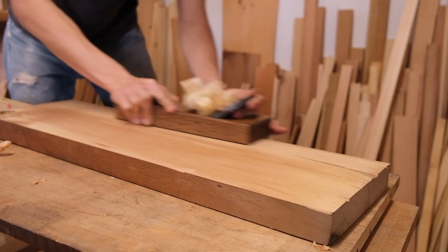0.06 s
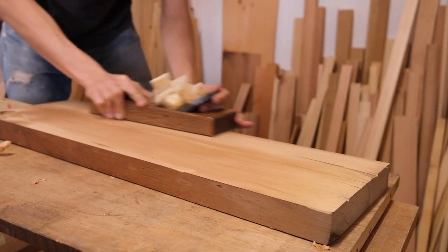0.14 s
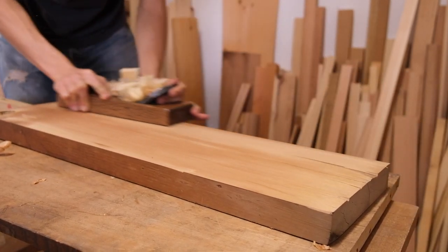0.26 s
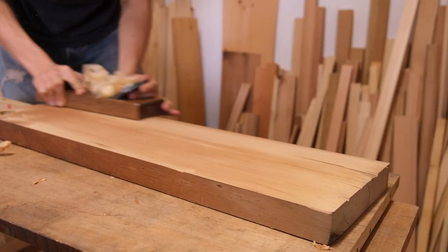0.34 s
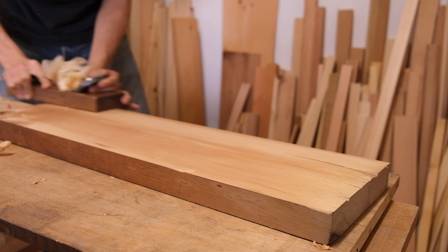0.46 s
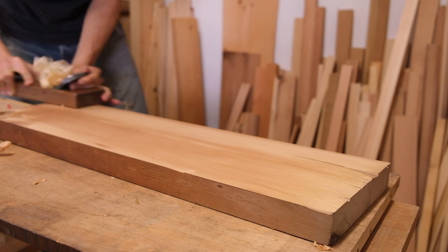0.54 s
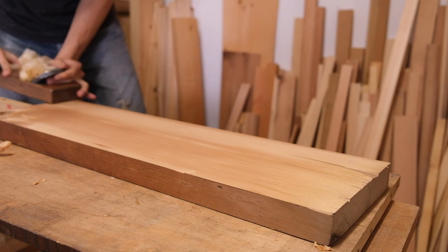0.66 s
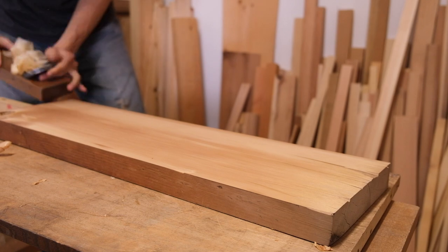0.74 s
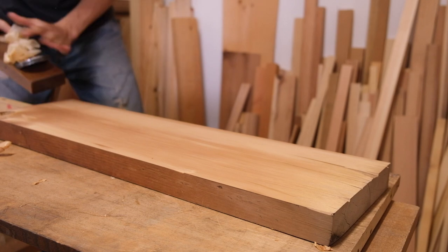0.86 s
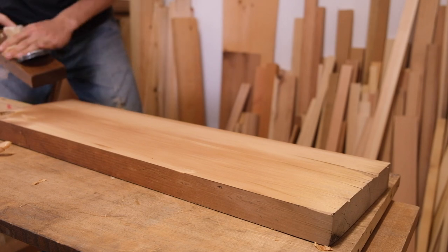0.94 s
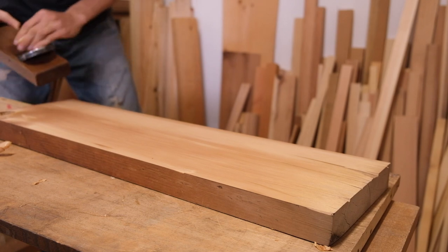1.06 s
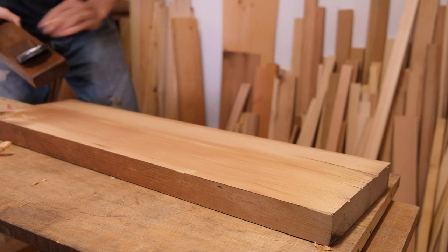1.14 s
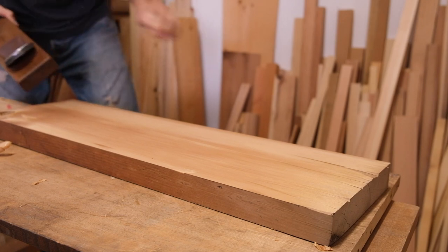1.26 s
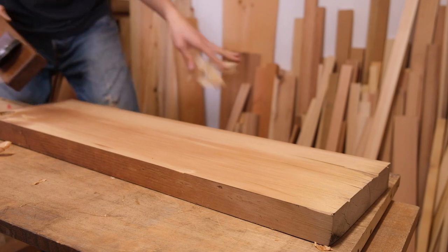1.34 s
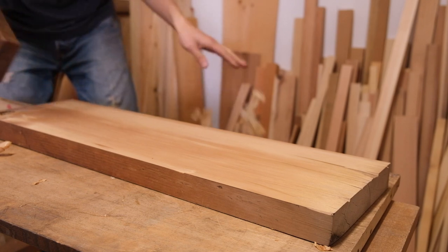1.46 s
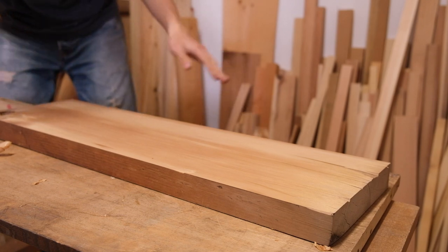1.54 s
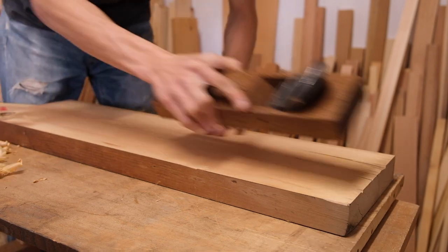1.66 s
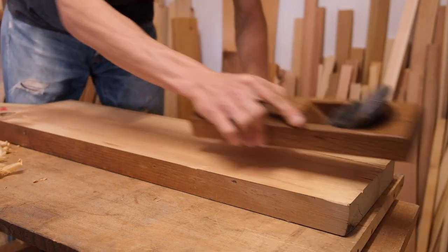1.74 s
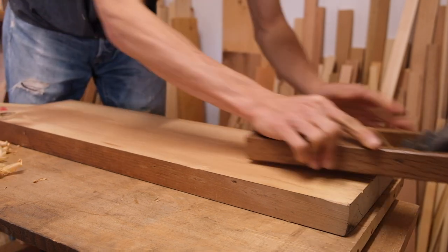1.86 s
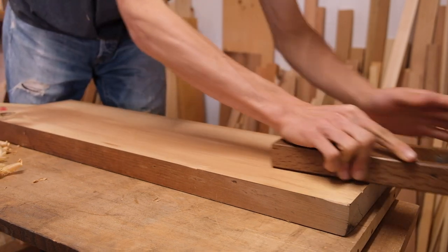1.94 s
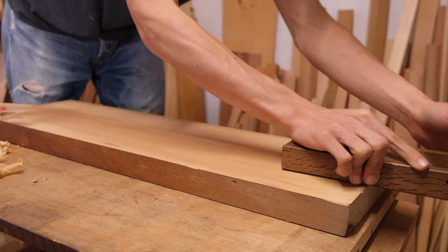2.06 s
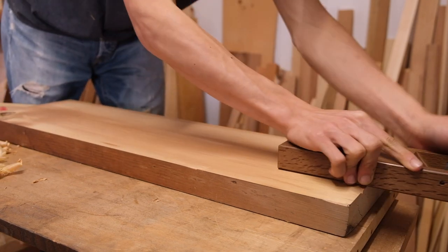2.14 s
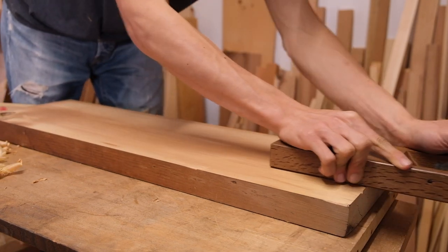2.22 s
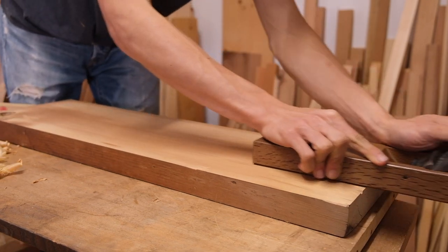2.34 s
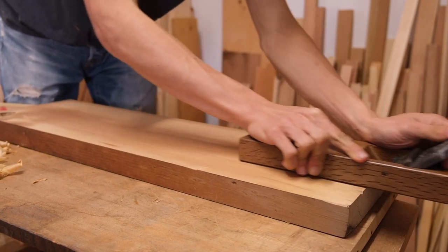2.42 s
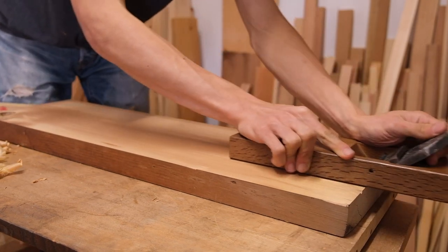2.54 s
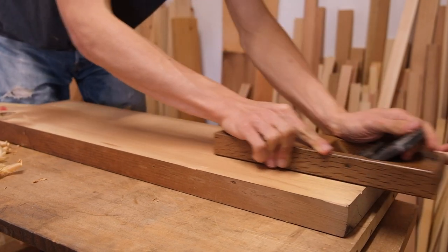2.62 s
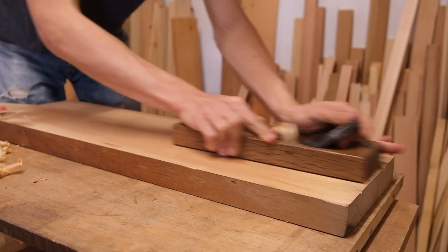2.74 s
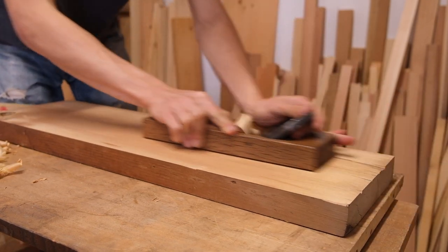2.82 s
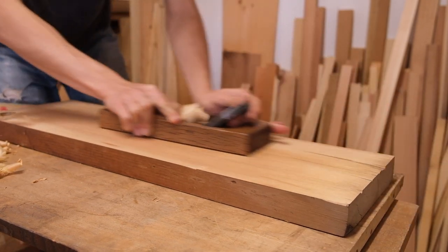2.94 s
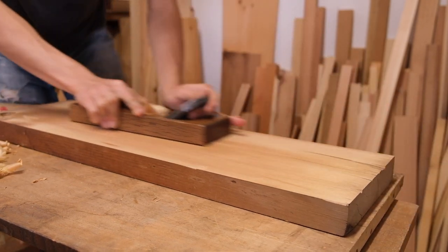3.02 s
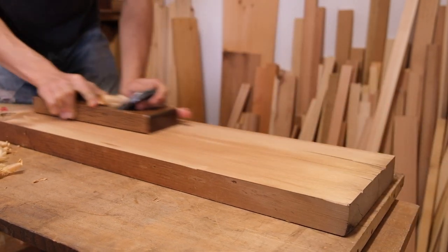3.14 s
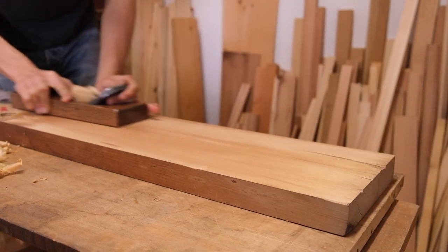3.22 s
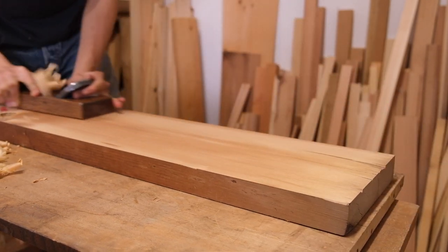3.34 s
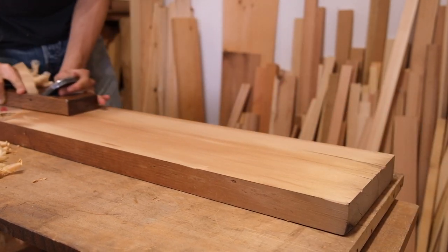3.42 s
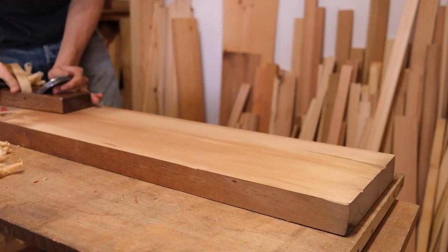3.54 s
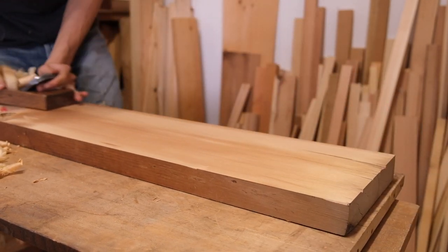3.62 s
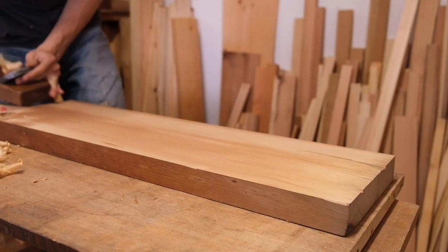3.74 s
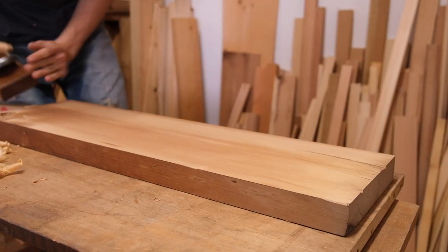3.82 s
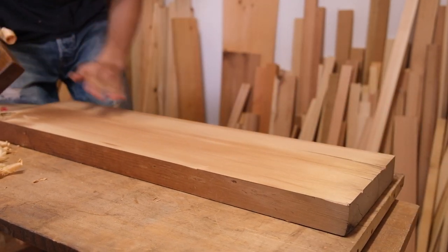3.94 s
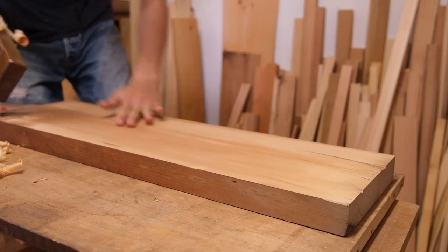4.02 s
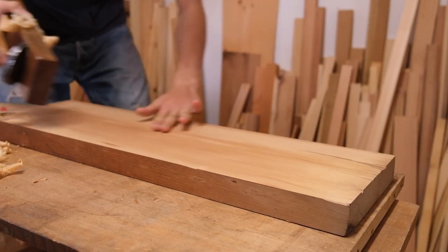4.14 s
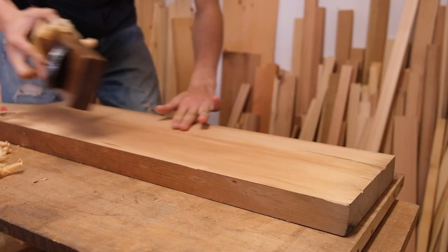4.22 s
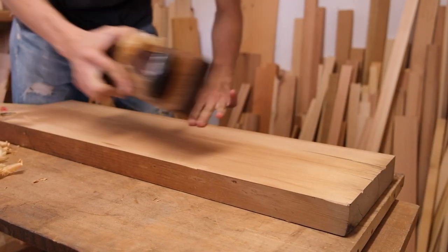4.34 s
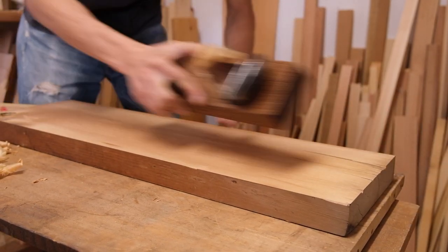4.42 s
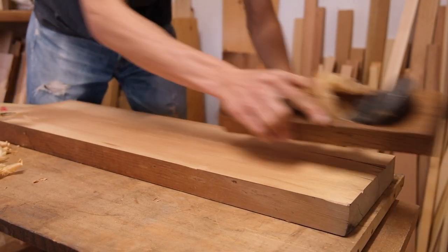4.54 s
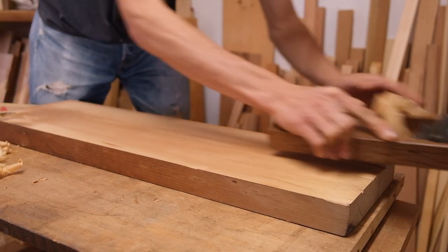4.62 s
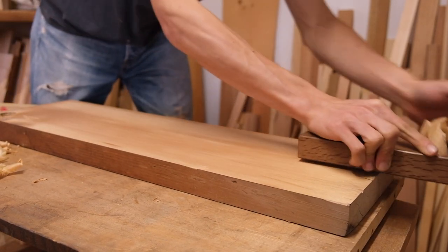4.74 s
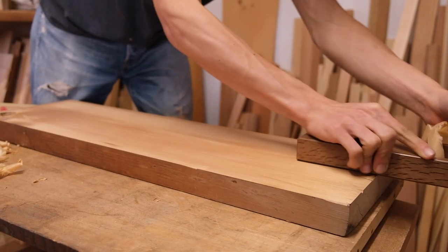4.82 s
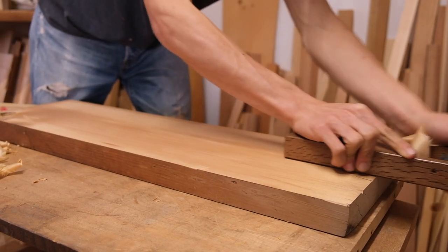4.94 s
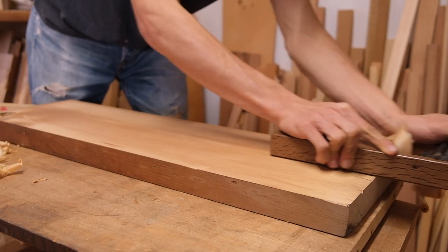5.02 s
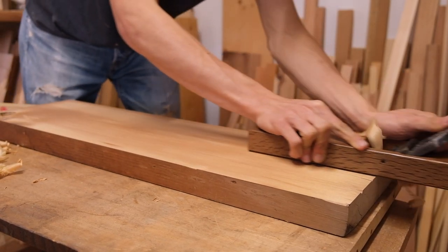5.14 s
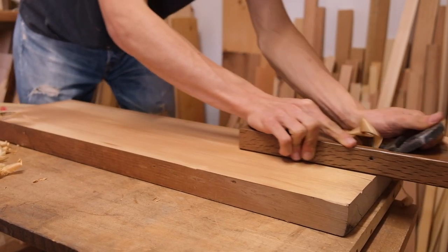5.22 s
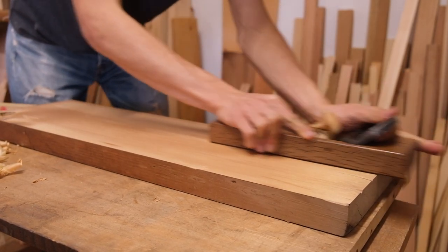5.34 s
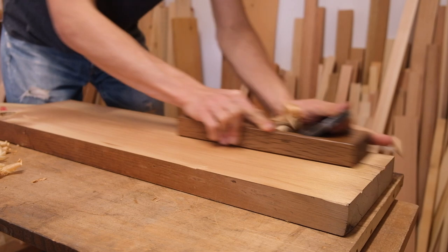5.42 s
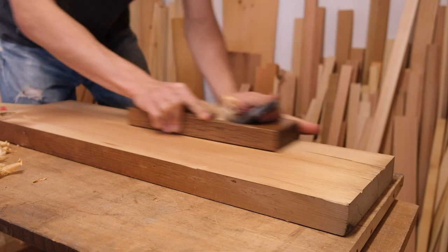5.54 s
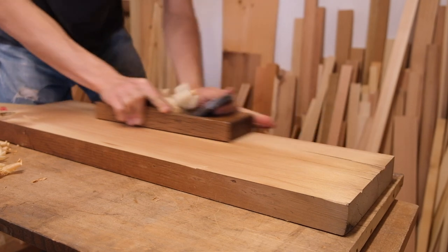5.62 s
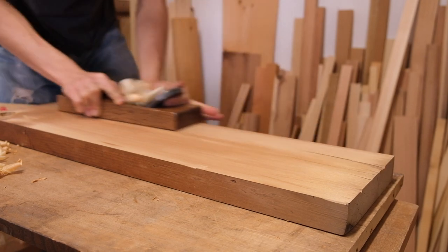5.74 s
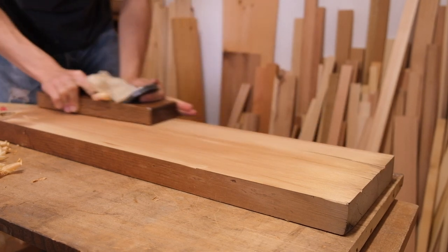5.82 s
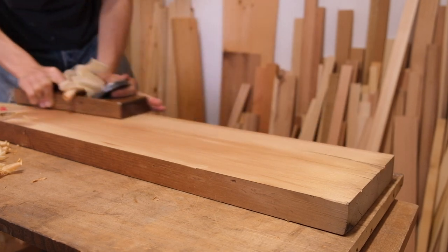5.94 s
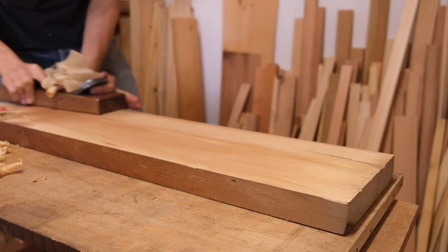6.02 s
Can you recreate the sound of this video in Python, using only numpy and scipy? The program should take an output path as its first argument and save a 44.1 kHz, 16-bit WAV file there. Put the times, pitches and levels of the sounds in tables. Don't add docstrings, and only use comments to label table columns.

```python
import sys
import numpy as np
from scipy import signal
from scipy.io import wavfile

SR = 44100
rng = np.random.default_rng(int(sys.argv[2]) if len(sys.argv) > 2 else 0)


def wav_out(sig):
    wavfile.write(sys.argv[1], SR, np.round(np.clip(np.atleast_2d(sig).T, -1, 1) * 32767).astype(np.int16))


def undo_db(level):
    steps = np.asarray(level, float) / 20
    return 10 ** steps


N = 268128
TIME = np.arange(N) / SR
STEPS = TIME[::64]
SCENE_CHANGE_S = 1.622
IDLE_HZ = 4100

# t/s, cut of the iron/dB, weight on the sole/dB, fibre pitch that follows speed f/Hz
STROKES = [
    [(0.0, -24.5, -31.5, 5940), (.075, -27.5, -36, 5940), (.11, -26.5, -32.5, 4650),
     (.214, -26.5, -31.5, 4650), (.3, -30, -34, 4990), (.4, -31.5, -34, 4100), (.472, -33, -34.5, 4450),
     (.534, -42, -32, 4640), (.57, -42, -51, 4500)],
    [(2.5, -33, -30, 4280), (2.559, -42, -32.5, 4060), (2.64, -24, -29.5, 3700), (2.77, -20.5, -33.5, 4450),
     (2.93, -24.5, -32.5, 5100), (3.01, -28, -32.5, 6170), (3.1, -36, -33, 4460), (3.4, -25, -33.5, 4120),
     (3.54, -42, -29.5, 4100)],
    [(5.05, -44, -46, 3590), (5.236, -40.5, -28, 3600), (5.305, -25.5, -30.5, 3600),
     (5.42, -25.5, -28.5, 5310), (5.53, -29, -32.5, 5390), (5.62, -34.5, -35.5, 4530),
     (5.78, -30.5, -31, 4400), (5.9, -29, -31.5, 4600), (6.08, -33, -32, 4200)],
]


def rms_one(x):
    return x / np.sqrt(np.mean(x ** 2) + 1e-20)


def in_time(tables):
    s, *columns = np.vstack(tables).T
    return [np.interp(TIME, s, column) for column in columns]


def every_sample(rows):
    return np.array([np.interp(TIME, STEPS, row) for row in rows])


def at_hz(points, hz):
    point_hz, point_db = np.array(points).T
    return np.interp(np.log(hz), np.log(point_hz), point_db)


def drift(rate):
    r = np.exp(-80 * np.pi * rate / SR)
    slow = signal.lfilter([1], [1, -2 * r, r * r], rng.standard_normal(N // 40 + 2002))[2000:]
    return np.interp(np.arange(N) / 40, np.arange(len(slow)), rms_one(slow))


def resonance(x, hz, width_hz):
    r = np.exp(-np.pi * width_hz / SR)
    poles = [1, -2 * r * np.cos(2 * np.pi * hz / SR), r * r]
    return signal.lfilter(np.array([1, 0, -1]) * (1 - r * r) / 2, poles, x)


def bands(sources, low_hz):
    edges = low_hz * 2 ** (np.arange(40) / 3)
    edges = edges[edges < 18000]
    for k, (low, high) in enumerate(zip(edges, edges[1:])):
        sos = signal.butter(2, [low, high], "band", fs=SR, output="sos")
        band = rms_one(signal.sosfilt(sos, sources[k % 2]))
        yield np.sqrt(low * high), band * np.sqrt(high - low)


def alive(s, length):
    t = np.arange(min(round(length * SR), N - round(s * SR))) / SR
    return t, ~((s < SCENE_CHANGE_S) & (s + t > SCENE_CHANGE_S))


def gesture(s, swell, fade):
    fall_db, roundness = 25, 1.55
    away = np.maximum((s - STEPS) / swell, (STEPS - s) / fade)
    ended = (s < SCENE_CHANGE_S) & (STEPS > SCENE_CHANGE_S)
    return undo_db(-fall_db * away ** roundness) ** 2 * ~ended


def on_wood():
    edge_s = 0.029
    total = 0
    for rows in STROKES:
        inside = np.minimum(TIME - rows[0][0], rows[-1][0] - TIME)
        total = total + np.clip(inside / edge_s + 1, 0, 1)
    return total


def hush():
    # f/Hz, level/dB per Hz
    hush_spectrum = [(12, -20), (20, 13), (70, -24), (130, 4.5), (168, -50), (198, -7), (241, -17),
                     (270, 3.5), (301, -49), (357, -33), (388, -11.5), (513, -20), (1960, -18),
                     (16000, -40)]
    level_db = -46.5 - 1.0
    parts = [(hz, band * undo_db(at_hz(hush_spectrum, hz)))
             for hz, band in bands(rng.standard_normal((2, N)), low_hz=14.15)]
    scale = undo_db(level_db) / np.std(sum(band for hz, band in parts))
    before = TIME < SCENE_CHANGE_S
    out = np.zeros(N)
    for hz, band in parts:
        early_db = -8.0 * (hz < 450) - 3.8 * (hz > 6000)
        out += band * undo_db(early_db * before)
    return scale * out


def layers(cut_db, bright_db, pitch_hz, rustle_db):
    per_bright, db_per_octave = 0.13, 22.5
    speed_octaves = np.log2(pitch_hz / IDLE_HZ)
    fine_db = cut_db + rustle_db + per_bright * bright_db + db_per_octave * speed_octaves
    return undo_db(np.array([cut_db - bright_db, cut_db, fine_db])) ** 2


def handling():
    # peak t/s, swell/s, fade/s, level/dB, brightness/dB
    shavings = [(.19, 0.023, 0.062, -28, 9), (.961, 0.022, 0.078, -23, 11.5),
                (1.111, 0.23, 0.082, -27.5, 9), (1.309, 0.041, 0.2, -35, 11.5),
                (1.42, 0.22, 0.061, -36.5, 10), (1.541, 0.023, 0.22, -36.5, 10),
                (1.68, 0.34, 0.091, -46.5, 15), (1.892, 0.09, 0.24, -40.5, 6), (3.0, 0.053, 0.046, -24, 23),
                (3.862, 0.07, 0.083, -42.5, 1), (3.98, 0.024, 0.06, -47, -1),
                (4.352, 0.0062, 0.092, -38.5, 2), (4.106, 0.073, 0.37, -44.5, 1),
                (4.29, 0.25, 0.23, -48, 52), (4.66, .3, .2, -59, 30), (5.158, .006, .03, -32, 8),
                (5.352, .04, .05, -29, 12), (2.605, .01, .05, -33, 3), (3.46, .06, .05, -33, 4),
                (.92, .03, .05, -46, 20), (5.45, .1, .12, -33, 60), (3.265, .02, .12, -33, 5),
                (1.97, .02, .08, -42, 6), (2.69, .07, .07, -30, 15), (4.958, .05, 0.35, -34.5, 5),
                (5.178, 0.12, 0.17, -31.5, 30), (5.536, 0.099, 0.029, -39, 14),
                (5.668, 0.091, 0.05, -28.5, 63)]
    # peak t/s, swell/s, fade/s, level/dB, brightness/dB
    rubs = [(.514, 0.063, 0.05, -25, 20.5), (.716, 0.39, 0.084, -46, -12.5), (.86, 0.56, 0.14, -61, -18),
            (2.068, 0.13, 0.1, -38, -9.5), (2.2, .15, 0.51, -46, 1.5), (2.4, 0.18, 0.34, -43.5, -1.5),
            (2.483, 0.013, 0.061, -24.5, 1.5), (3.577, 0.038, 0.079, -30.5, 0),
            (3.7, 0.19, 0.17, -42.5, -3.5), (4.5, 0.17, 0.2, -52.5, -2), (4.83, .012, .12, -57, 7),
            (4.55, .12, .035, -54, 3), (4.78, .09, .05, -58, -3)]
    stroke_rustle_db, shaving_rustle_db, rub_rustle_db = -19, -19.5, -25
    fibre_db = 2.5

    cut_db, sole_db, pitch_hz = in_time(STROKES)
    riding = on_wood()
    power = riding ** 4 * layers(cut_db, cut_db - sole_db, pitch_hz, stroke_rustle_db) + 1e-9
    touches = 0
    for rows, rustle_db in [(shavings, shaving_rustle_db), (rubs, rub_rustle_db)]:
        for s, swell, fade, db, bright_db in rows:
            touch = layers(db, bright_db, IDLE_HZ, rustle_db)[:, None]
            touches = touches + touch * gesture(s, swell, fade)
    power += every_sample(touches)
    return 10 * np.log10(power), pitch_hz, fibre_db * riding


def fibres(per_s, spread_db):
    hardness_db = spread_db * np.minimum(rng.exponential(1, (2, N)), 5.0)
    sizes = undo_db(hardness_db) * rng.choice([-1, 1], (2, N))
    return sizes * (rng.random((2, N)) < per_s / SR) + 1e-18


def rubbing():
    # f/Hz, width/Hz, level/dB
    iron_modes = [(871, 127, -2), (1180, 61, -1), (1287, 110, -9), (1593, 110, -6.5), (1740, 220, -4.5),
                  (1950, 200, 1.5), (3230, 170, -3), (4400, 710, -4.5), (4455, 210, -5), (5940, 690, -0.5),
                  (6700, 190, -20), (8110, 220, -2)]
    # f/Hz, level/dB per Hz
    tearing = [(180, -43), (300, -18), (645, -15.5), (885, -7), (1930, -3), (2700, -6.5), (4520, -2.5),
               (5250, -10), (8090, -9), (15000, -28), (16000, -23)]
    anchors_hz = [1200, 4500, 11000]
    iron_flicker_db, hiss_flicker_db, flicker_per_s = 1.6, 1.7, 9.7

    levels, pitch_hz, emphasis_db = handling()
    snaps = fibres(per_s=4500.0, spread_db=2.4)
    shared = drift(rate=5.1)
    parts = []   # Hz, sound, keenness for the fibre pitch, flicker dB
    for k, (hz, width_hz, db) in enumerate(iron_modes):
        ring = resonance(resonance(snaps[k % 2], hz, width_hz), hz, 2 * width_hz)
        parts.append((hz, undo_db(db) * np.sqrt(width_hz) * rms_one(ring), 1.6, iron_flicker_db))
    for hz, band in bands(snaps, low_hz=265.0):
        parts.append((hz, undo_db(-1.5) * band, 0.35, hiss_flicker_db))

    out = np.zeros(N)
    for hz, sound, keenness, flicker_db in parts:
        place = np.interp(np.log(hz), np.log(anchors_hz), [0, 1, 2])
        shares = np.clip(1 - np.abs(place - np.arange(3)), 0, 1)
        shape_db = at_hz(tearing, hz) - shares @ at_hz(tearing, anchors_hz) - shares @ [33, 37, 38]
        bump_db = emphasis_db * np.exp(-(np.log2(hz / pitch_hz) / 0.32) ** 2)
        chance_db = 0.59 * shared + flicker_db * drift(flicker_per_s)
        out += sound * undo_db(shares @ levels + shape_db + keenness * bump_db + chance_db)
    return out


def gliding_noise(pair, centre_hz, width_hz):
    r = np.exp(-np.pi * width_hz / SR)
    slow = signal.lfilter([1], [1, -2 * r, r * r], pair[0] + 1j * pair[1])[-len(centre_hz):]
    return rms_one(np.real(slow * np.exp(2j * np.pi * np.cumsum(centre_hz) / SR)))


def whistle():
    cut_db, sole_db, pitch_hz = in_time(STROKES)
    ridge = gliding_noise(rng.standard_normal((2, N)), pitch_hz, width_hz=850)
    patchy_db = 2.0 * drift(rate=4.4)
    return on_wood() ** 2 * undo_db(cut_db - 10.0 + patchy_db) * ridge


def creaks():
    # t/s, level/dB, f/Hz, length/s
    squeaks = [
        (0.636, -35, 1650, 0.044),
        (1.949, -31, 634, 0.056),
        (1.951, -33.5, 1985, 0.058),
        (5.061, -38, 1005, 0.049),
        (5.065, -40.5, 760, 0.041),
        (5.174, -29.5, 1917, 0.0244),
        (5.273, -36, 3260, 0.075),
        (5.389, -31, 1034, 0.036),
    ]
    # t/s, level/dB, first f/Hz, last f/Hz,
    # length/s
    scrapes = [(0.578, -45.5, 2600, 1242, 0.15), (0.76, -50, 1300, 800, 0.17),
               (2.594, -30, 1740, 1900, 0.072), (2.947, -29, 8100, 8100, 0.075),
               (3.24, -31, 4400, 4625, .25), (5.855, -33, 4620, 4900, 0.1),
               (3.685, -39.5, 1520, 1430, 0.04), (3.69, -45, 1950, 1900, 0.046),
               (3.5, -27, 1500, 1600, 0.016), (4.026, -48, 1458, 1400, .12), (4.815, -23, 510, 160, 0.0097),
               (0.62, -44, 2750, 2400, 0.07), (4.085, -53, 4700, 4700, .06),
               (4.8135, -19, 2750, 2750, .007), (4.221, -44, 2060, 2050, .015),
               (3.37, -36, 3250, 3200, .12), (4.825, -36, 1800, 1800, .07),
               (4.8124, -17, 3300, 3200, 0.003), (4.8122, -29, 6540, 5970, 0.0029),
               (4.8124, -12, 2100, 1900, .005), (5.76, -35, 2000, 1950, .24),
               (3.542, -31, 1570, 1500, .025), (.0, -32, 6300, 6000, .09), (0.24, -36, 6600, 6500, .12),
               (2.77, -31, 6000, 6300, .24), (0.78, -55, 3600, 3550, .14), (1.535, -41.5, 600, 500, .06)]
    squeak_width, squeak_sag, scrape_width = 0.027, 1, 0.16

    slips = [(s, db, hz, squeak_sag * hz, length, squeak_width * hz) for s, db, hz, length in squeaks]
    slips += [(*row, scrape_width * row[2]) for row in scrapes]
    noise = rng.standard_normal((len(slips), 2, SR // 4))
    out = np.zeros(N)
    for (s, db, first_hz, last_hz, length, width_hz), pair in zip(slips, noise):
        part = np.arange(round(length * SR)) / (length * SR)
        slip = gliding_noise(pair, first_hz + (last_hz - first_hz) * part, width_hz)
        out[round(s * SR):][:len(part)] += undo_db(db) * np.sin(np.pi * part) ** 0.2 * slip
    return out


def shaking(thumps):
    # peak t/s, swell/s, fade/s, low modes level/dB, upper modes level/dB
    shudders = [(.3, .2, 0.18, -51, -62), (.63, 0.24, 0.43, -42, -46.5), (1.4, 0.2, 0.13, -43, -41),
                (1.58, 0.05, 0.26, -56, -37.5), (2.42, 0.17, 0.19, -37, -44), (2.56, 0.12, 0.1, -29.5, -36),
                (3.26, 0.075, 0.08, -32, -39), (3.6, 0.13, 0.22, -33, -50), (4.1, 0.36, 0.56, -38.5, -46.5),
                (5.2, 0.59, .15, -47, -40.5), (5.43, 0.2, 0.25, -34.5, -50), (5.87, 0.11, 0.035, -52, -43)]
    shake_db = np.array([[-9], [-20.5]])
    still_db = np.array([[-62], [-73]])
    after_db, after_upper_db, after_t60 = -14.5, -34, 0.5

    weight = (on_wood() * undo_db(in_time(STROKES)[1])) ** 2
    power = weight * undo_db(shake_db) ** 2 + undo_db(still_db) ** 2
    shifts = 0
    for s, swell, fade, *modes_db in shudders:
        shifts = shifts + undo_db(np.array(modes_db))[:, None] ** 2 * gesture(s, swell, fade)
    power += every_sample(shifts)
    for s, first_db, second_db, third_db, rise in thumps:
        t, gate = alive(s, length=0.6)
        start = undo_db(np.array([[first_db + after_db], [third_db + after_upper_db]]))
        power[:, round(s * SR):][:, :len(t)] += gate * (start * undo_db(-60 * t / after_t60)) ** 2
    return np.sqrt(power)


def bench():
    # f/Hz, width/Hz, t60/s
    bench_modes = [(83.4, 8.5, 0.44), (115.9, 13.4, 0.41), (200.5, 53, 0.09)]
    # t/s, first, second and third mode level/dB
    pushes = [(.169, -23, -23.5, -30), (0.49, -23, -18, -16), (1.324, -25, -15.5, -20),
              (1.54, -27, -20.5, -12), (1.95, -22.5, -28, -8.5), (2.012, -20, -30, -20),
              (2.496, -25, -19.5, -9), (3.187, -20, -20, -12), (3.548, -19.5, -36, -14),
              (3.91, -31.5, -43, -49.5), (4.914, -11, -19.5, -10), (5.356, -22.5, -30, -40),
              (5.799, -61, -41, -27)]
    # t/s, first, second and third mode level/dB
    blows = [(0.705, -36, -27, -16.5), (2.06, -23, -42, -12.5), (2.109, -10.5, -14.5, -10.5),
             (3.502, -22, -34, -44), (3.971, -33.5, -40, -26), (4.16, -24, -19.5, -14.5),
             (4.224, -38, -23, -47), (4.363, -28, -25, -23), (4.815, -23, -16, -38), (4.822, -40, -26, -18),
             (2.99, -35, -24, -25), (3.655, -45, -25.5, -32)]
    push_rise_s, blow_rise_s = 0.01172, 0.0068

    thumps = [(*row, push_rise_s) for row in pushes] + [(*row, blow_rise_s) for row in blows]
    thumps = sorted(thumps)
    low, upper = shaking(thumps)
    shake = rng.standard_normal((2, N))
    low_hum = sum(resonance(shake[0], hz, width_hz) for hz, width_hz, t60 in bench_modes[:2])
    low_hum = low_hum + 0.052 * resonance(shake[0], 66, 11)
    upper_hum = resonance(shake[1], *bench_modes[2][:2]) + 0.38 * resonance(shake[1], 362, 245)
    out = low * rms_one(low_hum) + upper * rms_one(upper_hum)

    chance = rng.standard_normal((len(thumps), 6))
    for (s, *modes_db, rise), luck in zip(thumps, chance):
        s = s - max(rise - 0.005, 0)
        t, gate = alive(s, length=0.6)
        swell = gate * (1 - np.exp(-t / max(rise, 0.001))) ** 2
        sway_hz = 46 * (1 + 0.14 * luck[2])
        thump = undo_db(modes_db[0] - 13.0 - 60 * t / 0.55) * np.sin(2 * np.pi * sway_hz * t)
        for k, ((hz, width_hz, t60), mode_db) in enumerate(zip(bench_modes, modes_db)):
            sine = np.sin(2 * np.pi * hz * (1 + 0.07 * luck[k]) * t + luck[3 + k])
            thump = thump + undo_db(mode_db - 60 * t / t60) * sine
        out[round(s * SR):][:len(t)] += swell * thump
    return out


def struck(modes, t, t60, luck):
    hz, db = np.transpose(modes)[:, :, None]
    mode_t60 = t60 * (1000 / hz) ** 0.3 / (1 + (hz / 2600) ** 4)
    strength = np.sign(luck[2] + 0.5) * undo_db(db + 3.0 * luck[0] - 60 * t / mode_t60)
    return np.sum(strength * np.sin(2 * np.pi * hz * (1 + 0.04 * luck[1]) * t), axis=0)


def knocks():
    # f/Hz, level/dB
    body_modes = [(900, 5), (1050, -34), (1170, -5), (1310, 9.5), (1450, 5), (1620, -25), (1790, 2),
                  (2010, 9), (2500, 10), (2750, -55), (3100, 10.5), (3390, 11), (3800, -25), (4210, -41)]
    # f/Hz, level/dB
    board_modes = [(165, 4.5), (270, 4.5), (330, 2.5), (400, 3), (520, 0.5), (620, -5), (770, 5)]
    # t/s, peak level/dB, strongest ring f/Hz, t60/s
    taps = [
        (1.535, -26.5, 500, 0.043),
        (1.548, -30, 550, 0.043),
        (1.609, -31.5, 550, 0.033),
        (3.969, -36, 467, 0.057),
        (4.153, -25, 800, 0.025),
    ]
    landings = [(.698, -27.5, 1390, 0.041), (1.9485, -18, 1120, 0.053), (1.961, -15.5, 1147, 0.067),
                (2.009, -8, 1990, 0.02), (2.0125, -15, 1300, 0.02), (2.111, -26, 1330, 0.034),
                (2.47, -22.5, 1730, 0.038), (1.967, -17, 1180, 0.033), (1.9695, -15.5, 1970, 0.021),
                (2.0615, -15.5, 1150, 0.045), (4.816, -14, 1900, 0.021), (4.823, -26, 1770, 0.024),
                (4.911, -23.5, 1750, 0.027)]
    ticks = [
        (.744, -33, 1280, 0.058),
        (.956, -24, 1740, 0.039),
        (1.124, -34, 1840, 0.063),
        (3.18, -22, 2130, 0.035),
        (2.507, -26, 1670, .04),
        (3.554, -17.5, 1560, 0.035),
        (4.221, -39, 690, 0.067),
        (4.352, -15.5, 2096, 0.034),
        (5.149, -24.5, 900, 0.064),
    ]
    snaps = [
        (.528, -25, 1160, 0.035),
        (2.0575, -10.5, 1500, 0.03),
        (2.481, -28, 1440, 0.042),
        (2.494, -16, 1920, 0.042),
    ]
    slam = [
        (4.8113, 3.5, 1250, 0.014),
    ]
    booms = [(.7, -25.5, 280, .12), (1.951, -18, 230, 0.054), (2.0138, -7, 216, 0.04),
             (2.062, -14, 190, .05), (2.0236, -6, 216, .06), (3.19, -28, 260, .15), (3.575, -23.5, 280, .1),
             (4.166, -19, 316, 0.12), (4.16, -18, 163, .15), (4.362, -28, 303, 0.077),
             (4.822, -10, 162, 0.14), (4.855, -22, 380, .05), (3.975, -29, 299, .08),
             (4.813, -9, 476, 0.042), (1.537, -23, 298, 0.09)]
    # board/dB, crack/dB, plane body/dB, thud/dB
    kinds = [(taps, (-5, -26, -24.5, -15)), (landings, (-13, -22, -22.5, -24)), (ticks, (-22.5, -24, -19, -44)),
             (snaps, (-20.5, -10, -16, -22)), (slam, (-23.5, -15, -18.5, -21.5)), (booms, (-33, -60, -45, -25))]
    contact_lag_s = 0.0012

    hits = sorted((*row, *kind) for rows, kind in kinds for row in rows)
    chance = rng.standard_normal((len(hits), 3, len(body_modes) + len(board_modes), 1))
    noise = rng.standard_normal((len(hits), SR // 4))
    crack_band = signal.butter(3, [900, 4500], "band", fs=SR, output="sos")
    thud_band = signal.butter(2, [220, 900], "band", fs=SR, output="sos")
    cracks = rms_one(signal.sosfilt(crack_band, noise))
    thuds = rms_one(signal.sosfilt(thud_band, noise[::-1]))
    out = np.zeros(N)
    for hit, luck, crack, thud in zip(hits, chance, cracks, thuds):
        s, db, ring_hz, t60, board_db, crack_db, body_db, thud_db = hit
        t, gate = alive(s, length=0.25)
        touch = gate * (1 - np.exp(-t / 0.00028))
        body = undo_db(body_db) * struck(body_modes, t, 0.78 * t60, luck[:, :len(body_modes)])
        board = undo_db(board_db - 2.0) * struck(board_modes, t, 1.1 * t60, luck[:, len(body_modes):])
        board = board + undo_db(thud_db - 60 * t / 0.1) * thud[:len(t)]
        board = board * (1 - np.exp(-t / 0.0013))
        ring = undo_db(-5.5 - 60 * t / t60) * np.sin(2 * np.pi * ring_hz * t)
        crack_fade = undo_db(-60 * t / 0.015) + undo_db(-44 - 60 * t / 0.092)
        crack = undo_db(crack_db - 1.0) * crack[:len(t)] * crack_fade
        start = round((s + contact_lag_s) * SR)
        out[start:][:len(t)] += undo_db(db) * touch * (body + board + ring + crack)
    return out


def workshop(x):
    # f/Hz, t60/s, level/dB
    echo_bands = [(316, 0.22, 3.5), (880, 0.31, -2.5), (1740, 0.24, 2.5), (3300, 0.3, -1.5), (6800, 0.5, 3)]
    t = np.arange(SR // 2) / SR
    noise = rng.standard_normal((len(echo_bands), len(t)))
    tail = np.zeros(len(t))
    for (hz, t60, db), source in zip(echo_bands, noise):
        band = resonance(resonance(source, hz, hz), hz, hz) * np.sqrt(1000 / hz)
        tail += undo_db(db - 60 * t / t60) * band
    tail = tail * np.clip(t / 0.004 - 1, 0, 1)
    return signal.fftconvolve(x, tail[None] / np.sqrt(np.sum(tail ** 2)))[:, :N]


def scene():
    near = rubbing() + knocks() + creaks() + whistle()
    before = TIME < SCENE_CHANGE_S
    early_echo, late_echo = workshop(np.array([near * before, near * ~before]))
    echo = early_echo * before + late_echo
    return (near + undo_db(-13.5) * echo + bench() + hush())[None]


def low_pass(x):
    return signal.sosfilt(signal.butter(12, 15810, fs=SR, output="sos"), x)


def record(dry):
    return low_pass(np.clip(dry, -1, 1))


dry = scene()
out = record(dry)
wav_out(out)
```